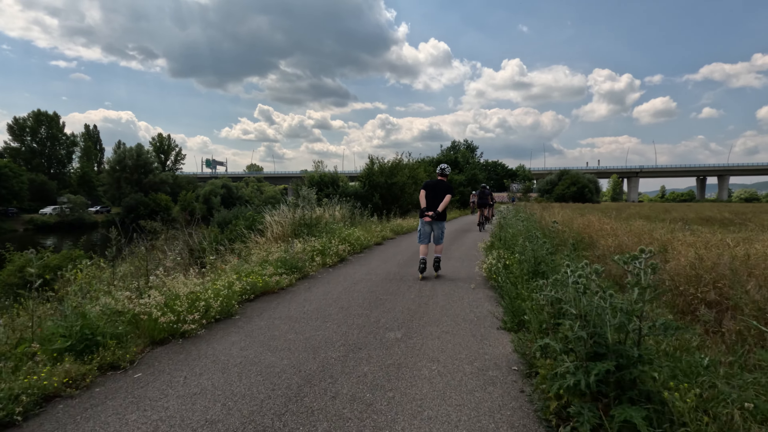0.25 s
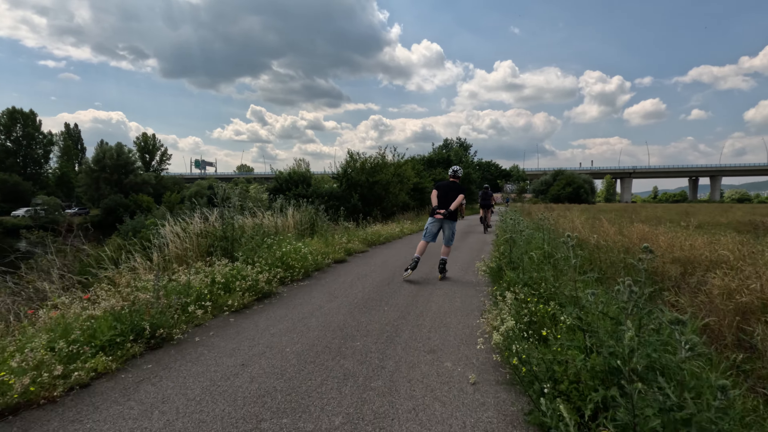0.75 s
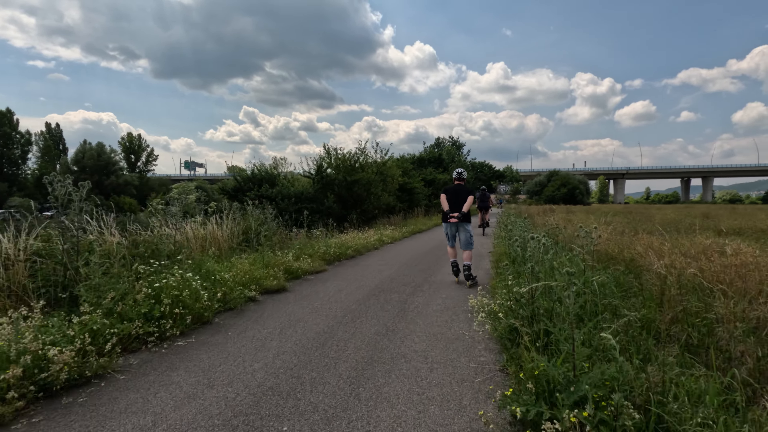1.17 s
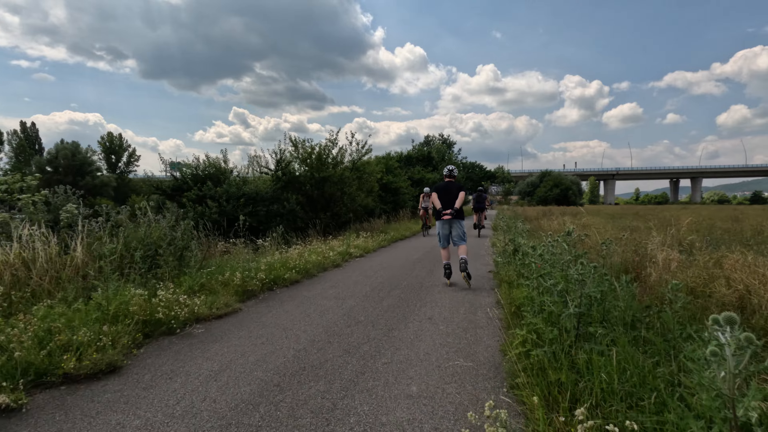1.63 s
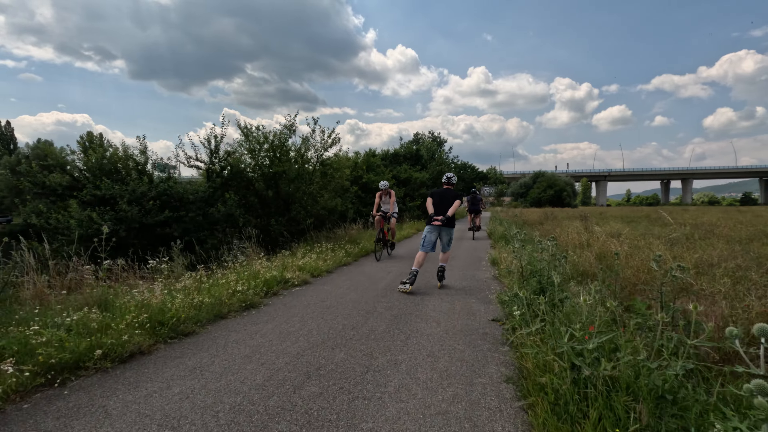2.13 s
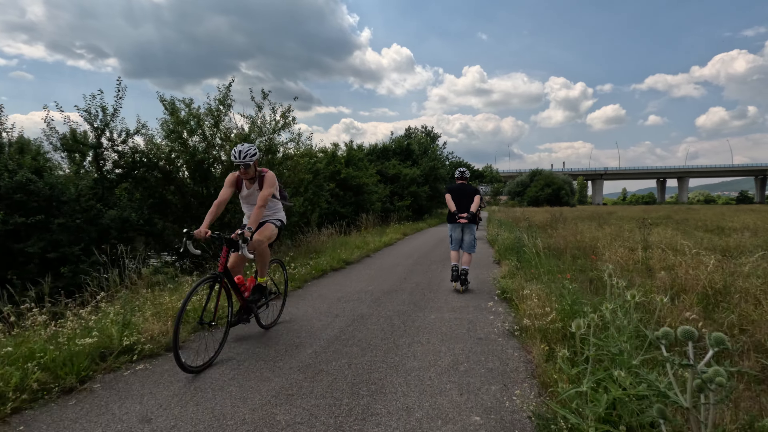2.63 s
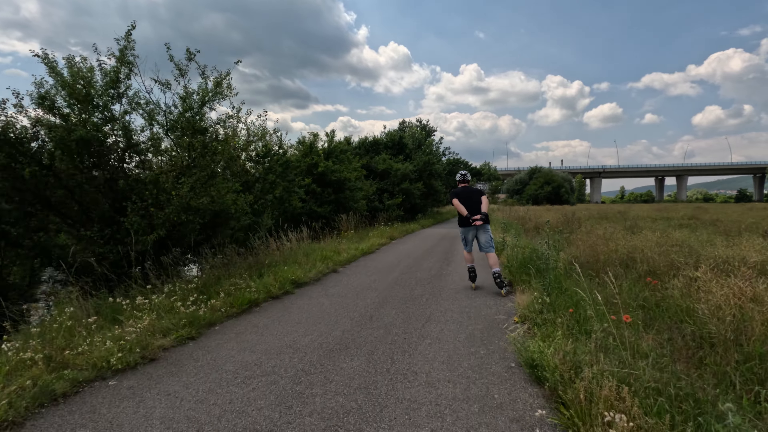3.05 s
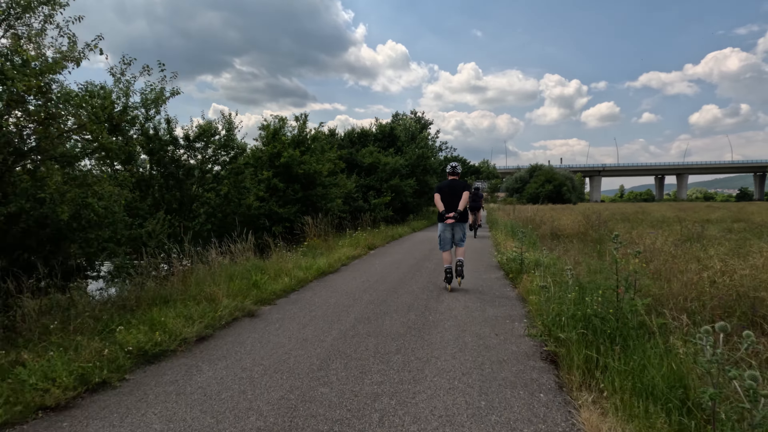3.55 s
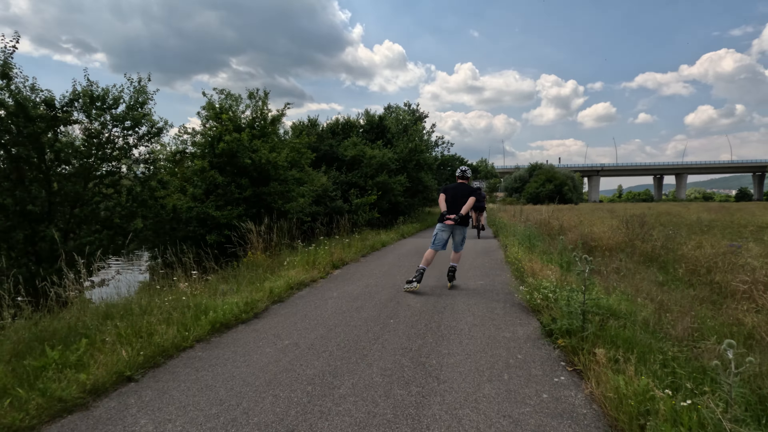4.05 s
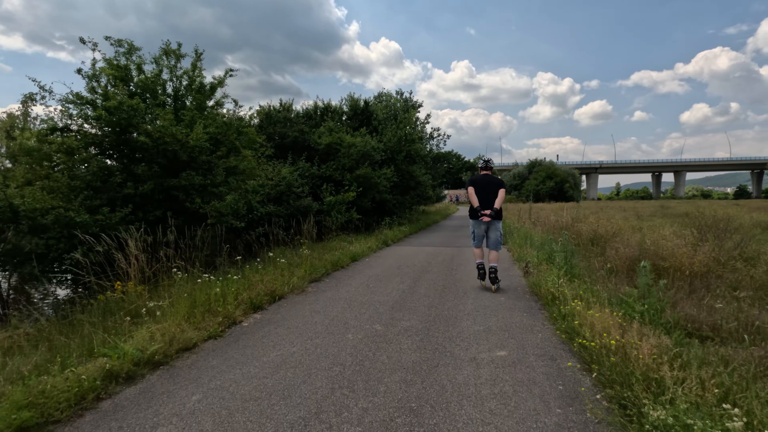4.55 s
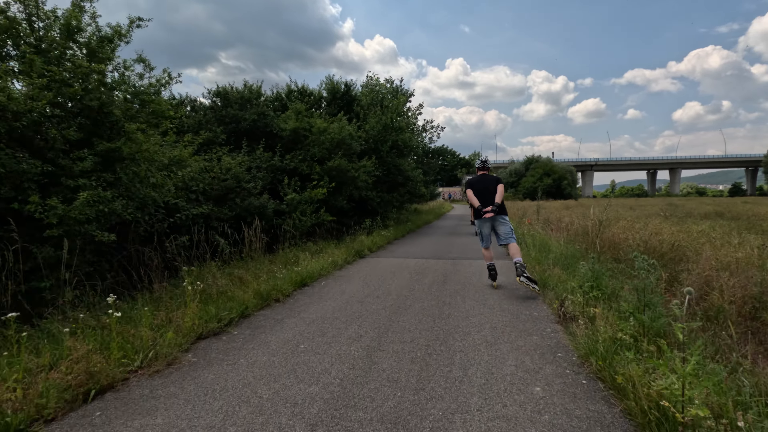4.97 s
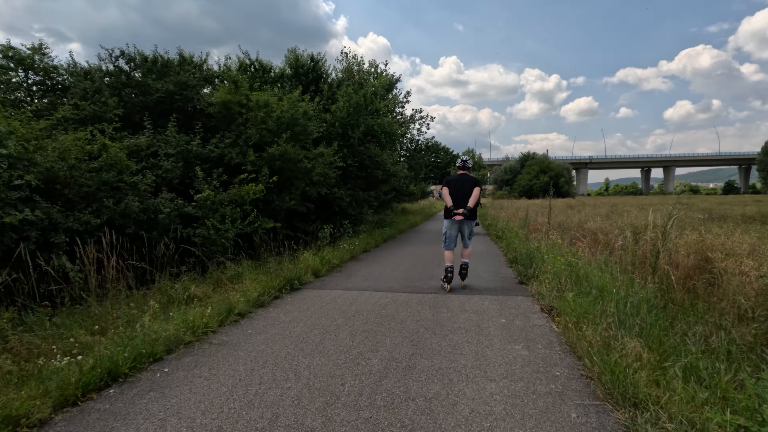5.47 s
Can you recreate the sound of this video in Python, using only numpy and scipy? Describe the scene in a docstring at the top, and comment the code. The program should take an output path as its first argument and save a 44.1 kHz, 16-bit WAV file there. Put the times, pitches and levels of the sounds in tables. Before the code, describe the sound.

From the start, wheels roll along an outdoor asphalt path with a steady, rough, low rumble, heard close from a microphone riding on the rolling frame. A wavering hum runs through it, with slight low wind and a faint hiss of tyres and air. Tiny, faint, high squeaks occur between about 0.9 and 1.8 seconds, and a small thud comes at 1.7 seconds. Lighter knocks at 2.7 seconds lead into the loudest moment, from 2.9 to 3.0 seconds: a bump brings a quick cluster of hard thuds, rattling loose parts and the ring of a thin steel disc. Smaller knocks follow around 3.2 and 3.3 seconds, and the soft ringing dies away soon after. The rumble continues at the same level, with a few more faint squeaks from 5 seconds, until the end at about 5.7 seconds.

```python
"""A low, rough rumble is heard first: a small camera rides a rolling frame along an asphalt path behind
a skater. The road's grain forces wheels and frame into vibration, and their modes sound straight into
both microphone ports. Over a bump the frame thuds, loose parts rattle and a thin steel disc rings on in
free vibration. Short friction squeaks sound near 5 kHz over a faint hiss of tyres and air."""
import sys
import numpy as np
from scipy import signal
from scipy.fft import rfft, irfft, next_fast_len
from scipy.io import wavfile
from scipy.ndimage import uniform_filter1d, minimum_filter1d

SR = 44100
rng = np.random.default_rng(int(sys.argv[2]) if len(sys.argv) > 2 else 0)


def bounce(signal):
    """Save signal as a 16-bit WAV file at the path given by the first command-line argument."""
    frames = np.transpose(np.atleast_2d(signal))
    limited = np.clip(frames, -1, 1)
    pcm = np.round(limited * 32767).astype(np.int16)
    wavfile.write(sys.argv[1], SR, pcm)


N = 251370
T = np.arange(N) / SR

# levels along the path: (time [s], rumble [dB], hiss [dB], bounce [dB], sway [dB])
PATH_LEVELS = [(0.04, -19, -51.5, -26.5, -24), (0.3, -18.5, -53, -21.5, -28), (0.8, -19, -54, -20, -27),
               (1.38, -19.5, -55.5, -17.5, -29), (2.17, -18.5, -53.5, -19, -28),
               (2.39, -20.5, -56, -12, -29), (2.6, -19.5, -53, -15, -33), (2.88, -18.5, -53.5, -16.5, -23),
               (3.1, -22, -50, -13, -33), (3.42, -19.5, -55.5, -17, -29), (3.8, -19.5, -54, -19.5, -29),
               (4.27, -19, -54, -19.5, -28.5), (4.75, -20.5, -55.5, -17.5, -28),
               (5.1, -17, -53.5, -20.5, -25.5), (5.66, -20, -53.5, -17.5, -27)]
# spectral envelopes of the noises: (frequency [Hz], relative spectral density [dB])
RUMBLE_SPECTRUM = [(60, -44), (91, -11), (141, -7.5), (190, -9.5), (260, -9.5), (345, -16), (555, -18),
                   (780, -21), (980, -27.5), (1730, -30.5), (2300, -43.5), (3050, -65), (4200, -82.5)]
THUD_SPECTRUM = [(200, 11.5), (400, 9.5), (700, 15), (1000, 5.5), (1450, 4.5), (2100, -11), (3000, -19.5),
                 (5000, -40), (8000, -92)]
RATTLE_SPECTRUM = [(1200, -19.5), (2000, -23), (3000, -11), (4500, 2), (6300, 0.5), (8500, -4.5),
                   (10500, -4.5), (11400, -11), (12200, -30.5), (16000, -62.5)]
SCRAPE_SPECTRUM = [(1000, -34), (1700, -4.5), (2400, 2), (3200, -4), (4800, -9.5), (7000, -39.5)]
SWAY_SPECTRUM = [(15, -24.5), (25, 22.5), (40, 9.5), (58, 24), (90, 16), (130, -51)]
HISS_SPECTRUM = [(1500, -23), (2500, 6.5), (3200, -0.5), (4000, -4), (5000, -4.5), (6300, -7), (8000, -11),
                 (10500, -15.5), (12500, -23.5), (14000, -30), (16000, -47.5)]
# resonance peaks on those envelopes: (frequency [Hz], bandwidth [Hz], lift [dB])
FRAME_MODES = [(235, 39, 5.5), (278.7, 27, 3), (315.4, 20, 7), (390.4, 27, 8), (495, 11, 6), (605, 39, 3),
               (1280, 110, 2), (1712, 77, 5.5)]
RATTLE_MODES = [(2400, 160, 6.5), (3213, 160, 4.5), (4240, 170, 6), (5270, 200, 6), (6160, 200, 4.5),
                (6460, 180, 5.5), (7400, 200, 6.5), (8600, 250, 5.5), (10050, 260, 7), (10500, 300, 4.5),
                (11350, 250, 6.5)]
SCRAPE_MODES = [(1760, 220, 8), (2050, 200, 4.5), (2670, 350, 4.5)]
HISS_WHISTLES = [(5720, 60, 3), (6050, 60, 4), (7450, 80, 2)]
# brief stalls of the frame's bounce: (time [s], depth [dB], half duration [s])
BOUNCE_STALLS = [(0.52, -18, 0.056), (0.683, 0, 0.016), (1.74, -13, 0.032), (2.007, -22, 0.031),
                 (2.218, -18, 0.03), (2.512, -15, 0.04), (2.773, -7.5, 0.098), (2.977, -10, 0.034),
                 (3.186, -11, 0.026), (3.467, -6, 0.023), (4.586, -19, 0.044), (4.761, -9, 0.016),
                 (4.88, -9, 0.029)]
# jolts from the road: (time [s], rattle [dB], thud [dB], scrape [dB], hold [s])
ROAD_JOLTS = [(0.76, -64, -63, -63, .022), (1.357, -64, -46, -50.5, 0.11), (1.72, -62, -25.5, -58, 0.056),
              (1.99, -74, -44, -52, 0.026), (2.64, -59, -58, -64, 0.015), (2.717, -65, -38, -40.5, 0.033),
              (2.788, -59, -29.5, -52, 0.051), (2.894, -46.5, -47, -42, 0.02),
              (2.913, -39, -16, -31.5, 0.037), (2.969, -43, -24, -39, 0.019), (3.04, -48, -38, -46, 0.052),
              (3.146, -52.5, -24.5, -44, 0.05), (3.268, -51, -40, -53, 0.02),
              (3.283, -57.5, -28.5, -57, 0.056), (4.58, -62, -49, -47.5, 0.026),
              (4.646, -64, -48, -50, 0.015), (4.764, -63, -46, -53, 0.018), (5.08, -62, -47, -62, 0.063),
              (5.192, -61, -56, -54, 0.064), (5.547, -62, -45, -52, 0.029)]
# hard blows on the frame: (time [s], level [dB], tilt about 700 Hz [dB/octave])
FRAME_BLOWS = [(1.768, -24, 1), (2.728, -32, 7), (2.752, -29, 3), (2.917, -18.5, 4.5), (2.923, -14, 5),
               (2.929, -19, 4), (2.935, -18, 1), (2.941, -24, 2), (2.947, -21, 2), (2.953, -17, -2),
               (2.959, -15, -1), (2.964, -28, -2), (2.972, -25, -5), (2.981, -11, -5.5), (2.99, -21, -1),
               (3.01, -20, -3), (3.165, -26, 4), (3.176, -24, 3), (3.184, -26, 1), (3.31, -25, 0)]
# modes of the struck frame: (frequency [Hz], gain [dB], t60 [s])
STRUCK_MODES = [(242, -10, 0.036), (327, -7, 0.049), (486, 2.5, 0.022), (723, -1.5, 0.044),
                (1030, -7.5, 0.04), (1430, -7.5, 0.053), (1760, -17.5, 0.025), (2040, -13.5, 0.02),
                (2730, -22.5, .02)]
# knocks of a loose part on the disc: (time [s], level [dB], tilt about 4 kHz [dB/octave])
DISC_KNOCKS = [(2.722, -53, 3.5), (2.902, -38, 2.5), (2.914, -24.5, 2), (2.934, -30.5, 2), (2.978, -33, 2),
               (3.006, -36.5, 1.5), (3.05, -33.5, -0.5), (3.082, -41.5, -1.5), (3.144, -38.5, 1.5),
               (3.168, -39, -6), (3.2, -48.5, -4), (3.272, -40.5, 2.5), (3.3, -43, 0.5),
               (3.335, -44.5, -2.5)]
# natural frequencies of the steel disc: (frequency [Hz])
DISC_MODE_HZ = [915, 1622, 2396, 2799, 3213, 4238, 5232, 6155, 6400, 7451, 9900, 11420]
# the same modes: (gain [dB], free t60 [s], left minus right [dB], flutter [dB], added damping t60 [s])
DISC_MODES = [(-5, 7.4, 13, 2, 4.1), (-4, 0.73, 15.5, 0, .5), (-5.5, 2.2, 1.5, 3, 0.41),
              (-20, .5, -7, 1, .5), (-8, 0.45, -7, 1.5, .5), (-5, 0.38, 10, 3, .9),
              (4, 0.087, -3, 3.5, 1.5), (-9, 0.18, -1, 5, .5), (-7, 0.05, 4, 4, .5),
              (-12.5, 0.13, -4, 4, .5), (-11, 0.05, 5.8, 2, .5), (-16, .04, -5, 5.5, .5)]
# course of the wheel hum: (time [s], level [dB])
HUM_LEVELS = [(0.0, -33.5), (0.6, -35), (0.72, -26.5), (1.05, -41.5), (1.2, -29), (1.5, -35), (2.0, -33),
              (2.5, -33), (2.7, -41), (2.95, -28.5), (3.15, -39.5), (3.62, -29), (3.88, -38.5), (4.05, -32),
              (4.4, -28.5), (4.6, -40), (4.8, -28.5), (5.7, -35)]
# friction squeaks: (time [s], duration [s], frequency [Hz], level [dB], bandwidth [Hz])
SQUEAK_EVENTS = [(0.862, .045, 4980, -58, 500), (1.395, .035, 4880, -59, 250),
                 (1.545, 0.055, 5600, -62, 500), (1.737, .022, 4900, -54, 450),
                 (1.771, 0.023, 4950, -52.5, 500), (4.995, 0.065, 4900, -55, 380),
                 (5.182, .085, 4950, -57, 1000), (5.546, .03, 5100, -62, 600)]
# stereo width at the ports: (frequency [Hz], side minus mid [dB])
PORT_WIDTH = [(25, -15.5), (60, -18), (140, -14.5), (250, -10.5), (500, -8.5), (1000, -7), (2000, -4.5),
              (4000, -1), (8000, -2.5), (13000, -0.5)]
# balance of the ports: (frequency [Hz], left minus right [dB])
PORT_BALANCE = [(60, .5), (140, .5), (250, -1.9), (500, -.3), (1000, 1.7), (2000, -.3), (4000, .6),
                (8000, -.3)]


def frame_rumble(level_db):
    """Forced vibration: the road's grain is a broadband drive, filtered by the frame's resonances."""
    grain = contact_noise(spread_db=.88, flutter_db=.84, flutter_hz=12)
    return undb(level_db) * at_ports(grain, RUMBLE_SPECTRUM, FRAME_MODES)


def frame_bounce(level_db):
    """Resonance: the frame's strongest mode swings fairly evenly, apart from brief stalls."""
    stall_db = sum(db * np.exp(-((T - s) / half) ** 2) for s, db, half in BOUNCE_STALLS)
    swing = driven_mode(hz=141.6, width_hz=19.3, drift=.012, evenness=.6)
    return undb(level_db + stall_db) * swing * pan(.5)


def jolts():
    """Transient excitation: each jolt releases noise bursts of thud, rattling parts and scraping."""
    times, rattle_db, thud_db, scrape_db, holds = np.transpose(ROAD_JOLTS)
    envelope = lambda levels: burst_envelope(zip(times, levels, holds), t60=.15)
    thud = at_ports(contact_noise(2.4, 2.3, 90), THUD_SPECTRUM, widen_db=3.5)
    rattle = at_ports(contact_noise(1.7, .8, 180), RATTLE_SPECTRUM, RATTLE_MODES)
    scrape = at_ports(contact_noise(2.46, 2.4, 120), SCRAPE_SPECTRUM, SCRAPE_MODES)
    return envelope(thud_db) * thud + envelope(rattle_db) * rattle + envelope(scrape_db) * scrape


def frame_blows():
    """Impulse response: each blow starts the frame's modes as damped sinusoids, in its own mix."""
    times, blow_db, tilt = np.transpose(FRAME_BLOWS)
    scatter_db = 2.5 * rng.standard_normal((len(times), len(STRUCK_MODES)))
    out = 0
    for (hz, db, t60), mix_db in zip(STRUCK_MODES, scatter_db.T):
        impulses = np.zeros(N)
        impulses[(times * SR).astype(int)] = undb(blow_db + db + tilt * np.log2(hz / 700) + mix_db)
        pole = undb(-60 / (t60 * SR)) * np.exp(2j * np.pi * hz / SR)
        out = signal.lfilter([1], [1, -pole], impulses).imag - out  # neighbouring modes alternate in sign
    return out


def steel_disc(rest_s=3.33):
    """Modal decay: each mode stores the energy of the knocks and loses it at its own rate."""
    powers = [burst_envelope([(s, db, .014)], t60=.085) ** 2 for s, db, _ in DISC_KNOCKS]
    tilts = np.transpose(DISC_KNOCKS)[2]
    jitter = .0061 * (sum(powers) / sum(powers).max()) ** .25  # knocks shake the phase
    resting_s = np.clip(T - rest_s, 0, None)  # the loose part comes to rest on the disc and damps it
    out = 0
    for hz, (db, t60, pan_db, flutter_db, damping_t60) in zip(DISC_MODE_HZ, DISC_MODES):
        fed = sum(power * undb(2 * tilt * np.log2(hz / 4000)) for power, tilt in zip(powers, tilts))
        energy = signal.lfilter([1], [1, -undb(-120 / (t60 * SR))], fed)
        phase = 2 * np.pi * np.cumsum(hz * (1 + jitter * wander(150))) / SR
        lag = np.array([[0], [rng.normal(0, .91)]])  # each mode reaches the ports from another side
        gain_db = db - 36 - 60 * resting_s / damping_t60 + flutter_db * wander(160)
        out += undb(gain_db) * pan(pan_db) * np.sqrt(energy) * np.sin(phase + lag)
    return out


def frame_sway(level_db):
    """Low-frequency random motion: wind and the frame's slow sway lie below the rumble."""
    return undb(level_db) * at_ports(rng.standard_normal((2, N)), SWAY_SPECTRUM)


def wheel_hum():
    """Narrow-band resonance: the wheels' hum comes and goes, a little different at each port."""
    mid, side = (driven_mode(hz=617, width_hz=33, drift=.011, evenness=.11) for _ in range(2))
    return undb(over_time(HUM_LEVELS)[0]) * (mid + undb(-14.5) * side * np.array([[1], [-1]]))


def squeaks():
    """Stick-slip friction: rubbing gives a raspy, narrow band of noise with a weak octave."""
    friction = contact_noise(spread_db=2.2, flutter_db=2.2, flutter_hz=250)
    friction[1] = .9 * friction[0] + .45 * friction[1]  # the right port hears nearly the same
    out = np.zeros((2, N))
    for s, duration, hz, db, width in SQUEAK_EVENTS:
        span = slice(int(s * SR), int((s + duration) * SR))
        edges_hz = np.array([hz - width / 2, hz + width / 2])
        bands = [signal.butter(2, k * edges_hz, "band", fs=SR, output="sos") for k in (1, 2)]
        tone, octave = (unit_rms(signal.sosfilt(band, friction[:, span])) for band in bands)
        out[:, span] += undb(db) * signal.windows.tukey(tone.shape[1], .4) * (tone + .2 * octave)
    return out


def air_hiss(level_db):
    """Broadband noise: tyres and air hiss, with narrow peaks heard as faint whistles."""
    return undb(level_db) * at_ports(contact_noise(1.3, .8, 14), HISS_SPECTRUM, HISS_WHISTLES)


def contact_noise(spread_db, flutter_db, flutter_hz):
    """Random impacts: many small contacts of uneven size give two noises that flutter together."""
    strength = undb(spread_db * rng.exponential(size=N) + flutter_db * wander(flutter_hz))
    return strength * rng.standard_normal((2, N))


def driven_mode(hz, width_hz, drift, evenness):
    """A randomly driven resonator swells and fades as its pitch drifts; evenness 1 flattens the swell."""
    resonate = lambda x: signal.lfilter([1], [1, -np.exp(-width_hz * np.pi / SR)], x)
    amplitude = resonate(resonate(rng.standard_normal(N) + 1j * rng.standard_normal(N)))
    amplitude /= np.abs(amplitude) ** evenness
    phase = 2 * np.pi * np.cumsum(hz * (1 + drift * wander(5))) / SR
    return unit_rms((amplitude * np.exp(1j * phase)).imag)


def burst_envelope(bursts, t60, rise_s=.0052):
    """Incoherent bursts (time [s], level [dB], hold [s]) rise, hold, decay, and add in power."""
    power = np.zeros(N)
    for s, db, hold in bursts:
        age = T - s
        decay_db = 60 * np.clip(age - hold, 0, 1) / t60
        power += (undb(db - decay_db) * np.clip(age / rise_s, 0, 1)) ** 2
    return np.sqrt(power)


def at_ports(noises, spectrum, modes=(), widen_db=0.):
    """Linear filtering: mid and side noises are coloured and mixed to left and right, at mid rms 1."""
    size = next_fast_len(N)
    hz = np.arange(1, size // 2 + 2) * SR / size
    gain = undb(over_frequency(spectrum, hz))
    for centre, width, db in modes:
        gain *= 1 + (undb(db) - 1) / (1 + (2 * (hz - centre) / width) ** 2)  # Lorentzian peak
    mid, side = rfft(noises, size) * gain
    side *= undb(over_frequency(PORT_WIDTH, hz) + widen_db)
    balance = pan(over_frequency(PORT_BALANCE, hz))
    out = irfft(np.array([mid + side, mid - side]) * balance, size)[:, :N]
    return out / np.sqrt(np.mean(out.mean(axis=0) ** 2))


def wander(rate_hz):
    """Slow random modulation: steps at rate_hz, smoothed twice, with a spread near 1."""
    hold = int(SR / rate_hz)
    steps = np.repeat(rng.standard_normal(N // hold + 1), hold)
    return 1.3 * uniform_filter1d(uniform_filter1d(steps, hold), hold)[:N]


def over_time(table):
    """Linear interpolation of each level column, one value a sample."""
    times, *columns = np.transpose(table)
    return [np.interp(T, times, column) for column in columns]


def over_frequency(table, hz):
    """Interpolation of (frequency [Hz], level [dB]) on a logarithmic frequency axis."""
    points_hz, db = np.transpose(table)
    return np.interp(np.log(hz), np.log(points_hz), db)


def pan(db):
    """Left and right gains for a level difference."""
    return undb(db * np.array([[.5], [-.5]]))


def undb(db):
    """Level to amplitude ratio."""
    return 10 ** (np.asarray(db) / 20)


def unit_rms(x):
    """Normalisation to rms 1."""
    return x / np.sqrt(np.mean(x ** 2))


def scene():
    """Superposition: all sources add at the two ports."""
    rumble_db, hiss_db, bounce_db, sway_db = over_time(PATH_LEVELS)
    rolling = frame_rumble(rumble_db) + air_hiss(hiss_db) + frame_sway(sway_db)
    tones = wheel_hum() + frame_bounce(bounce_db)
    return rolling + tones + jolts() + frame_blows() + steel_disc() + squeaks()


def record(dry, ceiling=.66, cutoff_hz=15700):
    """Peak limiting: the gain falls ahead of peaks above the ceiling; a low-pass then cuts the top."""
    window = 2 * (SR // 100)  # 10 ms to either side
    gain = np.minimum(1, ceiling / (np.abs(dry).max(axis=0) + 1e-9))
    gain = uniform_filter1d(minimum_filter1d(gain, window), window)
    lowpass = signal.ellip(10, .2, 70, cutoff_hz, fs=SR, output="sos")
    return signal.sosfilt(lowpass, dry * gain)


dry = scene()
out = record(dry)
bounce(out)
```